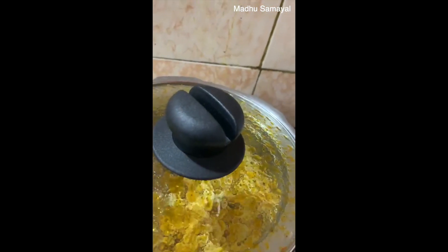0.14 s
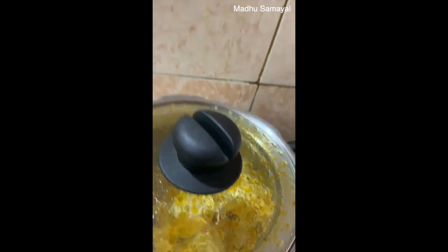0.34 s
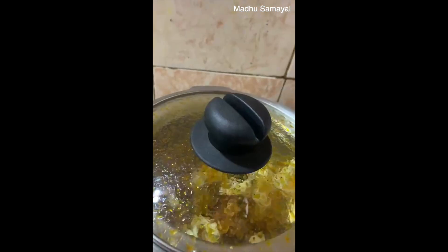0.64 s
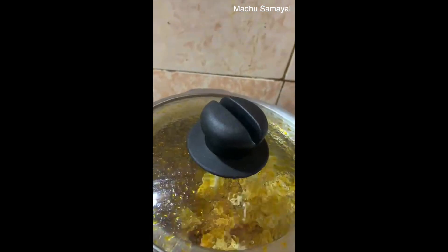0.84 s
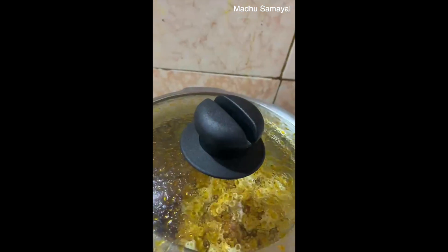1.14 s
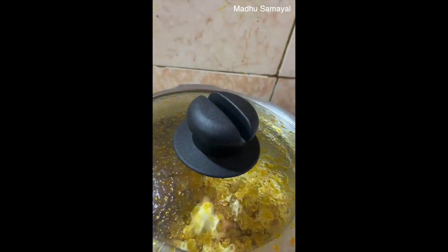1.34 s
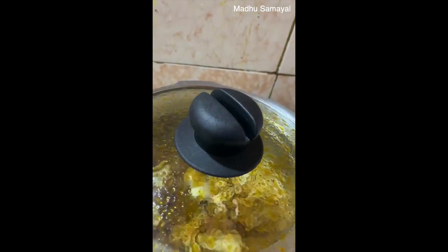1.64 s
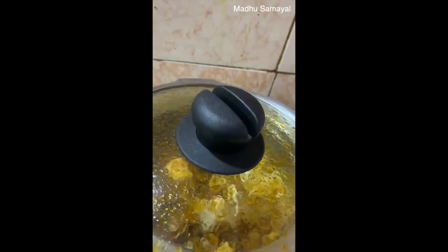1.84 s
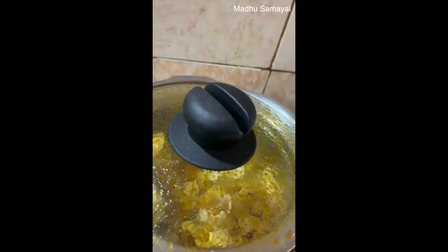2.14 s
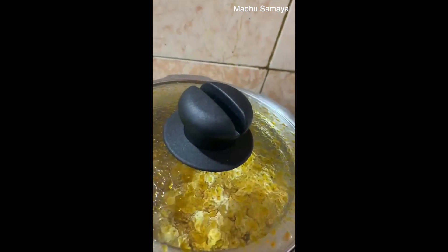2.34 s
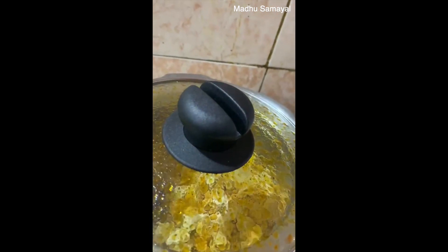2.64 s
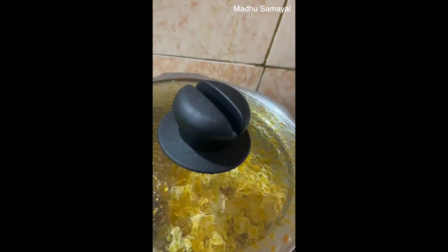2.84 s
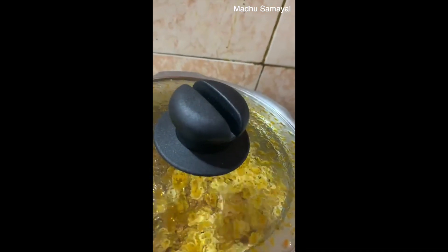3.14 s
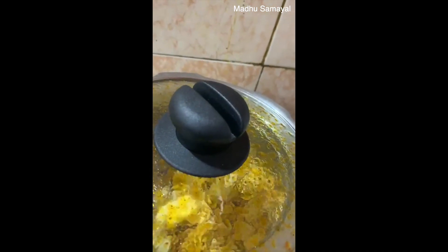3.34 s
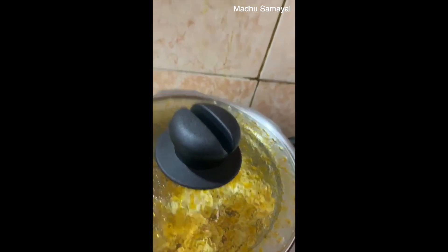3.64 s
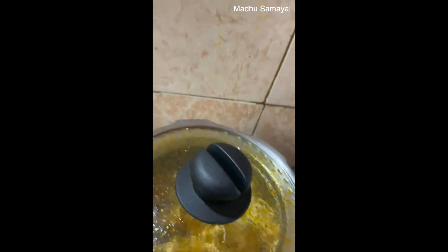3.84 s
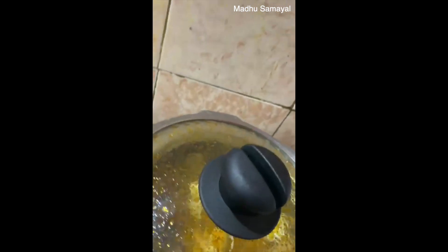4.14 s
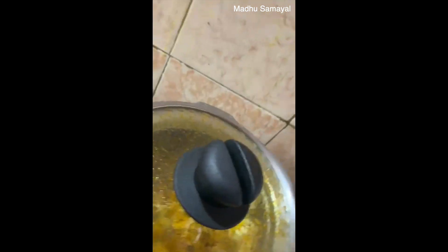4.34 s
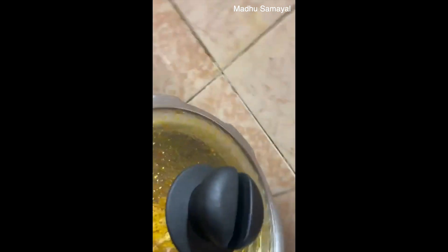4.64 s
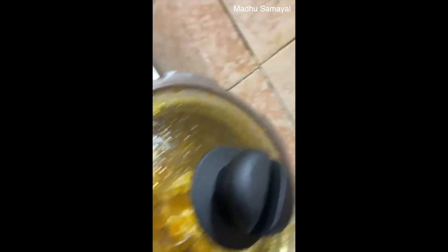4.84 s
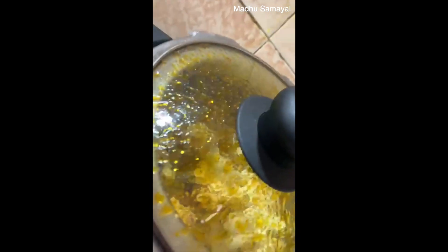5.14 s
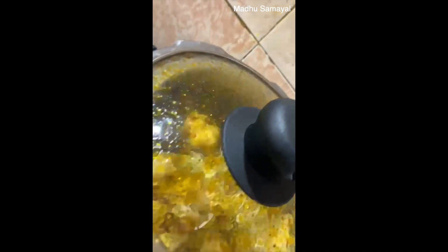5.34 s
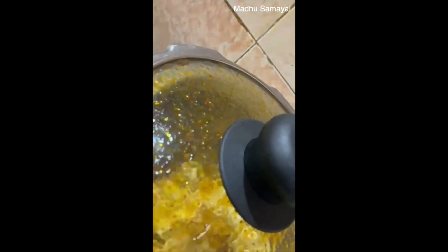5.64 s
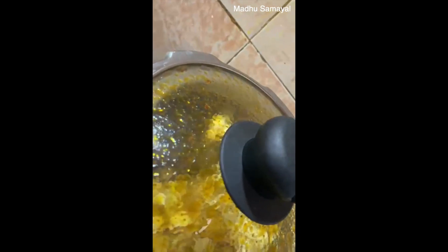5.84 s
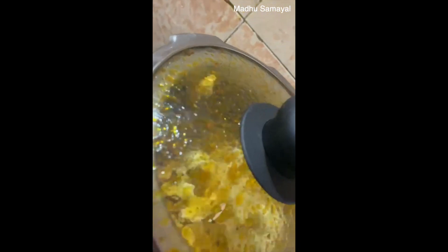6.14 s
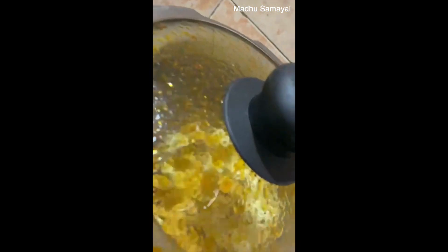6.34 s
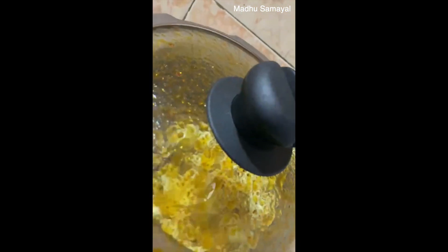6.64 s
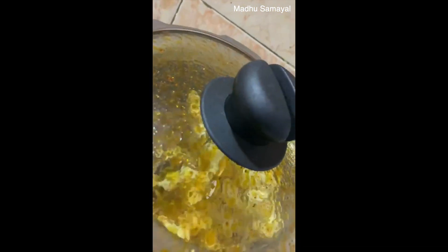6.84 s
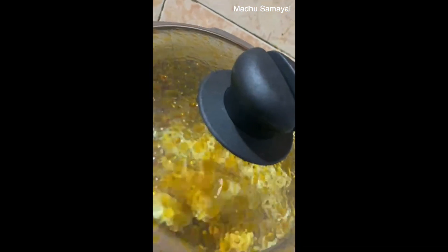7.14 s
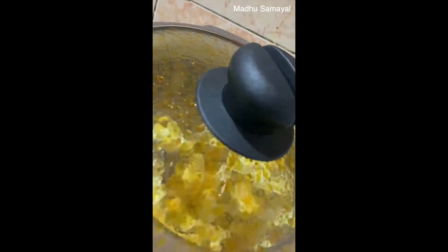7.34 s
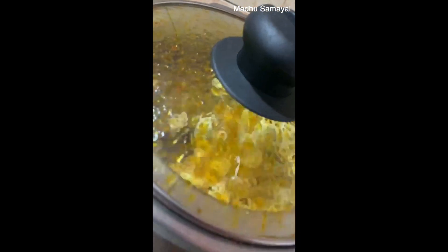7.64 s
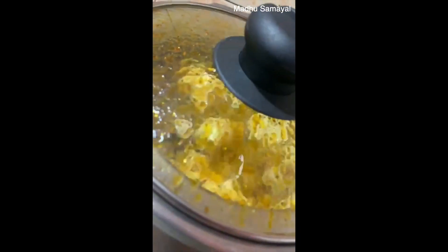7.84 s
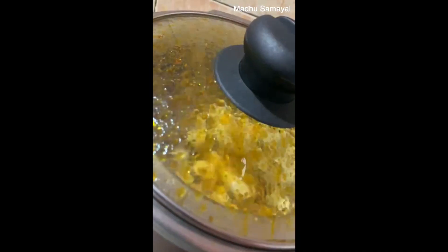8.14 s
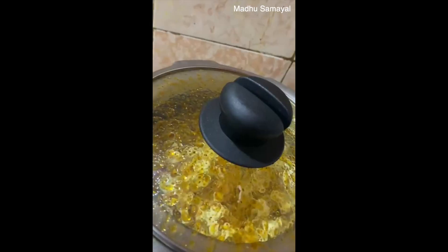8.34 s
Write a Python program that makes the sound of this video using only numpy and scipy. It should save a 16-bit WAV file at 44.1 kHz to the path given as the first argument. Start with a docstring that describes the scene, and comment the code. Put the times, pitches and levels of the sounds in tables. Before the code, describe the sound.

Corn pops quickly and unevenly in a metal pot under a glass lid. Each sharp crack carries a low thump, and flying kernels tap the glass and knock the sides while oil sizzles softly over a faint rumble. The sound cuts out briefly just after the start, then the popping carries on, growing busier in the second half. It is heard close up on a phone microphone in a tiled kitchen.

```python
"""You hear corn popping fast in a pot under a glass lid, with oil sizzling underneath.
Each pop is a hull tearing open: it cracks, rings the lid and sends a falling thump through the pot.
Flying kernels tap the glass, knock the metal and tick against each other.
A phone microphone with two openings (ports) listens close by in a tiled kitchen;
the sound drops out once near the start, and loud pops overload the input."""
import sys
import numpy as np
from scipy import signal
from scipy.fft import rfft, irfft, next_fast_len
from scipy.io import wavfile
from scipy.ndimage import uniform_filter1d, map_coordinates

SR = 44100
rng = np.random.default_rng(int(sys.argv[2]) if len(sys.argv) > 2 else 0)


def write(x):
    x = np.atleast_2d(x).T
    wavfile.write(sys.argv[1], SR, np.round(np.clip(x, -1, 1) * 32767).astype(np.int16))


N = 374409

# kernels bursting: t/s, crack level/dB, thump level/dB
POPS = [(0.1375, -15.5, -29.5), (0.5622, 0, -18.5), (0.635, -7, -28), (0.688, -4.5, -29),
        (0.7526, -2, -28.5), (0.9167, -15, -36), (1.0013, -18.5, -26), (1.2214, -7, -17),
        (1.4346, -14.5, -23.5), (1.5098, -8, -22.5), (1.6526, -10.5, -16.5), (1.7915, -12.5, -27),
        (1.8438, -12, -24), (1.9707, -1, -18), (2.1034, -2.5, -17.5), (2.15, -12.5, -23.5),
        (2.521, -6.5, -20.5), (2.6224, -39, -35.5), (2.818, -5, -18.5), (2.943, -8, -24),
        (3.1473, -21, -34), (3.2057, -3, -14.5), (3.242, -3.5, -35), (3.3257, -5.5, -26.5),
        (3.6885, -7.5, -20), (3.7771, -8.5, -21), (3.8527, 2.5, -17), (4.0026, -1.5, -17.5),
        (4.069, -1.5, -14.5), (4.155, -3.5, -17.5), (4.2869, -14.5, -30.5), (4.3856, -18.5, -30.5),
        (4.4401, -36, -30.5), (4.669, -4.5, -33), (4.6922, -11, -22.5), (4.7444, -2, -19),
        (4.9014, 3, -18.5), (4.9871, -8, -26), (5.1017, -0.5, -18.5), (5.2122, 0, -17),
        (5.3337, -8.5, -18.5), (5.5276, -9.5, -19), (5.6461, -16, -28), (5.7972, -18, -26),
        (5.8282, 4.5, -24), (5.8943, -19.5, -20), (5.9616, -3.5, -22), (6.0576, -7, -18),
        (6.1696, -0.5, -16), (6.4023, -6, -22), (6.4561, -10, -14), (6.6104, -11, -22.5),
        (6.7817, -2, -18.5), (6.9111, -7, -14), (6.9822, -12, -18.5), (7.0385, -8.5, -23),
        (7.1417, -3.5, -29), (7.1664, -9.5, -17.5), (7.3207, -14.5, -26), (7.3926, -13.5, -26),
        (7.4213, -4, -17.5), (7.4789, 1, -13.5), (7.5141, -3.5, -17.5), (7.6104, -7, -25), (7.7253, 0, -18),
        (7.8091, -15, -18), (7.8265, -15.5, -17.5), (7.8998, -5, -18.5), (7.9304, -0.5, -20),
        (8.077, -5, -19), (8.1396, -2, -11.5), (8.2122, 1.5, -23), (8.4477, -5, -13)]
# kernels hitting the glass: t/s, crack level/dB, ring level/dB, pitch of the struck spot/Hz
TAPS = [(0.1141, -25, -34, 6040), (0.5878, -1.5, -5.5, 6800), (0.6987, -7, -12, 7600),
        (0.9489, -29, -18, 7800), (1.4567, -2, -32, 6800), (1.477, -2.5, -8, 6920),
        (1.5353, 5.5, -12, 7680), (1.5433, -4, -7.5, 7050), (1.6913, -3, -16, 6700), (1.7, 2.5, -8, 6360),
        (2.2089, -8.5, -23, 5280), (2.5833, -10.5, -21.5, 6370), (2.9263, -6, -23, 6600),
        (3.1754, -6, -23, 5960), (3.2979, -5, -15, 6600), (3.3724, -0.5, -9, 6100), (4.7208, 5, -1.5, 7650),
        (4.9267, -14.5, -22, 6880), (5.012, 0, -19, 7030), (5.031, -5, -15.5, 6210),
        (5.558, -5.5, -12, 7700), (5.568, -5, -4.5, 6800), (5.7385, -11.5, -23, 6300),
        (5.874, -0.5, -15.5, 6800), (6.0017, -22, -36, 7220), (6.2234, -7, -26, 6900),
        (6.2765, -18.5, -25, 7160), (6.8917, -16, -32, 6040), (6.898, -0.5, -21, 6300),
        (6.947, 4.5, 2, 6400), (7.058, -3.5, -22, 6140), (7.1798, -5.5, -13.5, 6630),
        (7.233, -7, -29, 6560), (7.2496, -20.5, -23, 6710), (7.3047, -5.5, -25, 6510),
        (7.3268, -8.5, -20, 6550), (7.4466, -0.5, -18, 6530), (7.585, -9.5, -21.5, 5780),
        (7.6772, -14, -25.5, 6200), (7.855, 0.5, -30, 6950), (8.1647, 15, -9, 6540)]
# kernels hitting the pot: t/s, level/dB, pitch of the struck spot/Hz
KNOCKS = [(0.1925, -26, 1350), (0.5873, -19, 1380), (0.8227, -17, 1710), (0.846, -11, 1900),
          (1.0311, -7.5, 1574), (1.294, -23.5, 1700), (1.4567, -11, 1400), (1.543, -7, 1760),
          (1.654, -15, 1960), (1.696, -15, 1370), (1.8225, -15, 1310), (1.888, -14.5, 1780),
          (2.1528, -15, 1820), (2.213, -7.5, 1940), (2.569, -8, 1670), (2.5856, -12, 1340),
          (2.8358, -15, 1800), (2.963, -9, 1620), (3.042, -18, 1790), (3.2138, -18.5, 1320),
          (3.3172, -9.5, 1530), (3.7282, -4, 1820), (4.2013, -12, 1450), (4.7426, -36.5, 1950),
          (4.934, -8.5, 1370), (5.031, 3.5, 1240), (5.1966, -18.5, 1420), (5.259, -15, 1370),
          (5.3594, -10.5, 1500), (5.5564, -3.5, 1680), (5.7, -18, 1380), (5.8324, -7.5, 1360),
          (6.1095, -26.5, 1340), (6.137, -11, 2090), (6.1932, -12, 1380), (6.8973, -17.5, 1450),
          (6.9382, -12.5, 1420), (6.984, -11.5, 1780), (7.0585, -10, 1490), (7.0688, -10.5, 1740),
          (7.163, -14, 1470), (7.232, -19.5, 1370), (7.422, -14, 2000), (7.443, -21, 1470),
          (7.5872, -14.5, 1560), (7.6805, -14.5, 1790), (7.7708, -21, 1650), (7.867, -4.5, 2020),
          (7.988, -24.5, 1330), (8.1693, -19.5, 1460)]


def amp(db):
    """Turns decibels into a gain; amp(-60 * t / t60) fades by 60 dB in t60 seconds."""
    return 10 ** (np.asarray(db) / 20)


def unit(x):
    """Scales a sound to an average (rms) level of 1."""
    return x / np.sqrt(np.mean(x ** 2) + 1e-20)


def along(points, hz):
    """Reads between (f/Hz, value) points on a log frequency axis."""
    f, v = np.transpose(points)
    return np.interp(np.log(hz + 1), np.log(f + 1), v)


def filtered(x, response):
    """Multiplies each frequency f in x by response(f)."""
    m = next_fast_len(N + SR // 2)
    return irfft(rfft(x, m) * response(np.fft.rfftfreq(m, 1 / SR)), m)[..., :N]


def coloured(x, colour):
    """Gives x a tone colour, listed as (f/Hz, level/dB) points."""
    return filtered(x, lambda f: amp(along(colour, f)))


def placed(times, rows):
    """Adds up one short sound per row, each from its start time."""
    where = np.round(times * SR).astype(int)[:, None] + np.arange(rows.shape[1])
    return np.bincount(where.ravel(), rows.ravel(), N + SR)[:N]


def ringing(modes, strike_db, scatter_db, attack_s):
    """One row per blow: each mode (a natural tone of the object) rings with a fresh strength and pitch."""
    t = np.arange(SR // 7, dtype=np.float32) / SR
    luck = rng.standard_normal((len(strike_db), 3, len(modes))).astype(np.float32)
    rows = 0
    for k, (hz, db, t60) in enumerate(modes):
        size = np.sign(luck[:, 2, [k]]) * amp(strike_db[:, [k]] + db + scatter_db * luck[:, 0, [k]])
        pitch = hz * (1 + 0.0056 * luck[:, 1, [k]])
        rows = rows + size * amp(-60 * t / t60) * np.sin(2 * np.pi * pitch * t)
    return rows * (1 - np.exp(-t / attack_s))


def pops_and_taps():
    """Start times and crack levels of all pops, then all taps."""
    return np.vstack([np.array(POPS)[:, :2], np.array(TAPS)[:, :2]]).T


def kitchen(x):
    """The tiled room echoes, differently at each port; each frequency dies at its own speed."""
    # echo length: f/Hz, t60/s
    fade_times = [(100, 0.71), (1500, 0.28), (6000, 0.18), (11000, 0.2)]
    hz, t, noise = signal.stft(rng.standard_normal((2, SR // 2)), SR, nperseg=256)
    tail = signal.istft(noise * amp(-60 * t / along(fade_times, hz)[:, None]), SR, nperseg=256)[1]
    delayed = np.pad(x, (200, 0))[None]
    return signal.fftconvolve(delayed, tail / np.linalg.norm(tail[0]), axes=1)[:, :N]


def sputter():
    """Extra loudness for the hiss: each pop stirs the oil, which spits unevenly and settles."""
    starts, db, _ = np.transpose(POPS)
    t = np.arange(SR // 3) / SR
    spit_hz = 90
    spits = map_coordinates(rng.standard_normal(int(spit_hz * N / SR) + 4), [spit_hz * np.arange(N) / SR])
    return placed(starts, amp(db[:, None] - 26 - 60 * t / 0.3)) * amp(4.0 * spits)


def stove():
    """Frying oil hisses in patches over a low rumble."""
    # hiss loudness; near the end the hiss fades out and back in, as at an edit: t/s, level/dB
    hiss_levels = [(0, -45.5), (.6, -34.5), (1.1, -42), (2.4, -40.5), (3.6, -42.5), (4.3, -52),
                   (4.6, -48.5), (4.8, -40), (8.25, -44.5), (8.33, -112), (8.49, -18.5)]
    # tone colour of the oil: f/Hz, level/dB
    oil_colour = [(240, -12), (400, -0.5), (1170, -5.5), (1870, -2), (2900, -7.5), (3790, 2.5),
                  (4960, -88.5), (5250, -5.5), (7170, -7), (8500, -9.5), (11800, -14), (15300, -37.5),
                  (22000, -120)]
    # tone colour of the rumble: f/Hz, level/dB
    rumble_colour = [(25, -9), (60, 9), (130, -13), (330, -4.5), (500, -29), (1100, -120)]
    noise = signal.stft(rng.standard_normal((2, N)), nperseg=512)[2]
    # random louder and softer patches, smoothed over pitch and time
    patches = uniform_filter1d(uniform_filter1d(rng.standard_normal(noise.shape), 8, 1), 8, 2)
    hiss, rumble = signal.istft(noise * amp(2.5 * unit(patches)), nperseg=512)[1][:, :N]
    oil_gain = amp(np.interp(np.arange(N) / SR, *np.transpose(hiss_levels))) + sputter()
    return oil_gain * unit(coloured(hiss, oil_colour)) + amp(-39.5) * unit(coloured(rumble, rumble_colour))


def tumbling():
    """Popped corn jostles: faint random ticks crowd just after the pops and taps."""
    # dry corn on corn: f/Hz, level/dB
    tick_colour = [(300, -18.5), (800, 2.5), (1500, 7), (3500, -8), (6500, 2.5), (11000, -13.5)]
    luck = rng.random((1500, 3))
    triggers, _ = pops_and_taps()
    after = triggers[(luck[:, 0] * len(triggers)).astype(int)]
    starts = np.minimum(after - .07 * np.log(luck[:, 2] + 0.00033), N / SR)
    db = -39 - 4 * np.log(luck[:, [1]] + .02)  # a few stand out
    t = np.arange(SR // 60) / SR
    ticks = amp(db - 60 * t / 0.014) * rng.standard_normal((len(starts), len(t)))
    return coloured(placed(starts, ticks), tick_colour)


def thuds():
    """A kernel's knock on the pot starts with a dull burst of noise."""
    # corn touching metal: f/Hz, level/dB
    thud_colour = [(250, -19), (500, -4.5), (1500, 1), (2600, -6), (5000, -4)]
    starts, db, _ = np.transpose(KNOCKS)
    t = np.arange(SR // 15) / SR
    shape = amp(db[:, None] - 2 - 60 * t / 0.059) * (1 - np.exp(-t / .001))
    return coloured(placed(starts, shape * rng.standard_normal(shape.shape)), thud_colour)


def knocks():
    """Flying kernels and pops ring the pot, most strongly near the pitch of the struck spot."""
    # ringing tones of the metal: f/Hz, level/dB, t60/s
    pot_modes = [(1340, 11, 0.039), (1447.5, 4.5, 0.11), (1625, 13.5, 0.02), (1748, -4.5, 0.14),
                 (1800, 2.5, 0.098), (2155, -6, 0.019)]
    pop_starts, _, thump_db = np.transpose(POPS)
    floor_hz = np.full(len(POPS), 1450.0)  # every pop strikes the floor of the pot
    jolts = np.transpose([pop_starts, thump_db - 2.5, floor_hz])
    starts, db, spot_hz = np.transpose(np.vstack([KNOCKS, jolts]))
    octaves_away = np.abs(np.log2(np.transpose(pot_modes)[0] / spot_hz[:, None]))
    ring = ringing(pot_modes, db[:, None] - 7.0 - 55 * octaves_away, scatter_db=4.0, attack_s=0.0012)
    # loose corn lying on the metal makes the ring flutter
    flutter = signal.resample(rng.standard_normal((len(starts), 60)), ring.shape[1], axis=1)
    return placed(starts, ring * amp(0.53 * flutter))


def lid():
    """Soft puffs ring the whole glass lid; hard kernels pick out high tones near the struck spot's pitch."""
    # ringing tones of the glass: f/Hz, level/dB, t60/s
    glass_modes = [(2039, -3, 0.057), (2360, -13, 0.11), (2627, 0.5, 0.032), (3393, 10.5, 0.015),
                   (3670, -3, 0.02), (4127, 18, 0.0087), (5370, -26, 0.074), (5466, -14.5, 0.045),
                   (5586, 7, 0.023), (5905, -6.5, 0.056), (6190, 0, 0.034), (6340, -11.5, 0.03),
                   (6510, 8.5, 0.018), (7100, -12, 0.045), (6910, -13, 0.12), (7450, -53, 0.061),
                   (7570, -18, 0.034)]
    mode_hz = np.transpose(glass_modes)[0]
    starts, _ = pops_and_taps()
    _, pop_db, _ = np.transpose(POPS)[..., None]
    _, tap_db, ring_db, spot_hz = np.transpose(TAPS)[..., None]
    octaves_away = np.abs(np.log2(mode_hz / spot_hz))
    is_low = mode_hz < 4500
    from_pops = pop_db + np.where(is_low, -12, -13)
    from_taps = np.where(is_low, tap_db - 17.5, ring_db + 5.5 - 24 * octaves_away)
    strike_db = np.vstack([from_pops, from_taps])
    return placed(starts, ringing(glass_modes, strike_db, scatter_db=3.5, attack_s=0.0025))


def thumps():
    """A bending wave runs round the pot: high parts arrive first, so the pitch falls to the rocking tone."""
    # low tones of the pot on its burner: f/Hz, level/dB, t60/s
    body_modes = [(107.3, 5.5, 0.27), (181.8, -7.5, 0.62), (254.1, -6.5, 0.19), (322, 1.5, 0.16),
                  (375, -6, 0.11), (456.7, -19, 0.23)]
    rocking_hz, crest_s = 61, .0059
    starts, _, db = np.transpose(POPS)
    t = np.arange(SR // 4) / SR
    detune = 1 + 0.037 * rng.standard_normal((len(starts), 1))
    falling_hz = ((1.3 / (t + 1e-4)) ** 4 + rocking_hz ** 4) ** .25
    turns = np.cumsum(falling_hz) / SR
    turns -= np.interp(crest_s, t, turns)  # a crest of pressure leads the wave
    rise = 1 - np.exp(-(t / .0035) ** 3)
    fade = amp(3 - 60 * t / .04) + amp(-5 - 60 * t / .2) + amp(-17 - 60 * t / .6)
    wave = amp(db[:, None] + 4) * rise * fade * np.cos(2 * np.pi * turns * detune)
    hum = ringing(body_modes, db[:, None] + np.full(len(body_modes), -5.0), scatter_db=4.5, attack_s=0.015)
    return placed(starts, wave) + placed(starts, hum)


def cracks():
    """The hull tears with a bright snap and a puff of steam; taps on the glass get the same snap."""
    # tone colour of the snap: f/Hz, level/dB
    snap_colour = [(300, -9), (1000, -13.5), (3000, -1), (5000, 2), (7000, 1), (9000, 3), (10700, 4),
                   (12000, -16)]
    starts, db = pops_and_taps()
    t = np.arange(SR // 12) / SR
    tear = amp(-60 * t / .018)
    steam = amp(-19 - 60 * t / 0.031)
    shape = (tear + steam) * (1 - np.exp(-(t / 0.0021) ** 2))
    # the tear is ragged: it comes in uneven spurts
    spurts = signal.resample(rng.standard_normal((len(starts), 50)), len(t), axis=1)
    snaps = amp(db[:, None] + 6.63 * spurts) * shape * rng.standard_normal(spurts.shape)
    return coloured(placed(starts, snaps), snap_colour)


def scene():
    """One sound reaches both ports, the right a little late; the room adds its own echo at each."""
    # how far the left port is ahead: f/Hz, phase/radians
    left_lead = [(0, 0), (950, -.4), (2410, 1), (4310, 3), (6030, 5.6), (7490, 6.5), (8350, 9.2),
                 (9560, 9.6), (11500, 12.6)]
    bright = cracks() + lid() + knocks() + thuds() + tumbling()
    bass = thumps()
    near = bright + amp(-11) * kitchen(bright)[0] + bass + amp(-15) * kitchen(bass)[0] + stove()
    balance = amp([[-.2], [.2]])
    lead_hz, lead = np.transpose(left_lead)
    ports = filtered(near, lambda f: balance * np.exp([[.5j], [-.5j]] * np.interp(f, lead_hz, lead)))
    # the deep bass stays out of the echo that differs between the ports
    upper_bass = filtered(bass, lambda f: f ** 2 / (f ** 2 + 300 ** 2))
    return ports + amp(-10.0) * kitchen(bright + upper_bass)


def record(dry):
    """The microphone loses the highest treble, drops out once and squashes the loudest pops."""
    mic_hz, top_hz = 11924, 15900
    silent_from_s, silent_to_s = .248, .545
    t = np.arange(N) / SR
    x = filtered(dry, lambda f: np.clip((mic_hz + 100 - f) / 200, 0, 1))
    x = x * ((t < silent_from_s) | (t > silent_to_s))
    x = x / (1 + np.abs(x) ** 12) ** (1 / 12)  # overload rounds off the peaks
    x = filtered(x, lambda f: np.clip((top_hz - f) / 400, 0, 1))
    return np.clip(x, -1, 1)


dry = scene()
out = record(dry)
write(out)
```